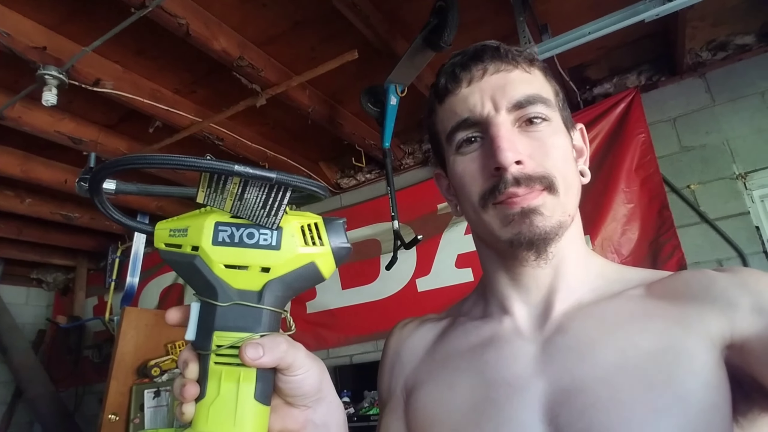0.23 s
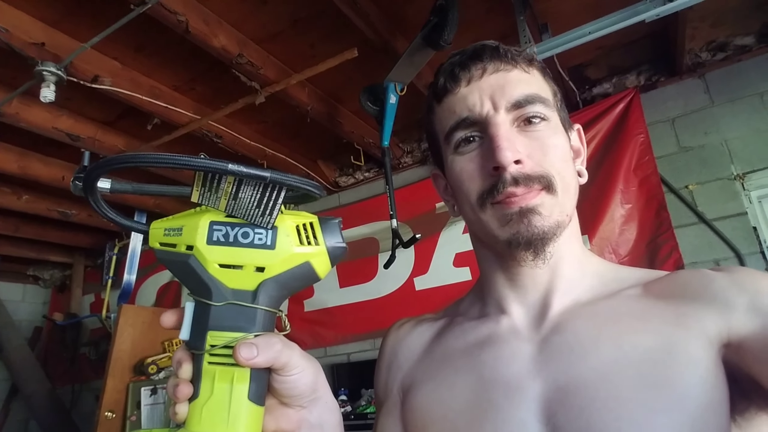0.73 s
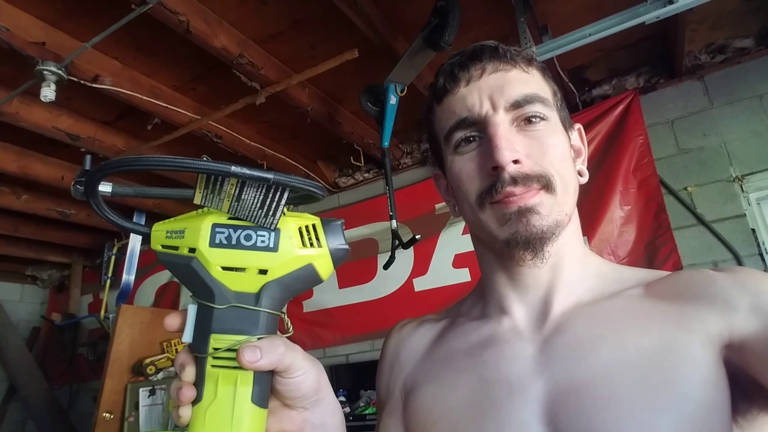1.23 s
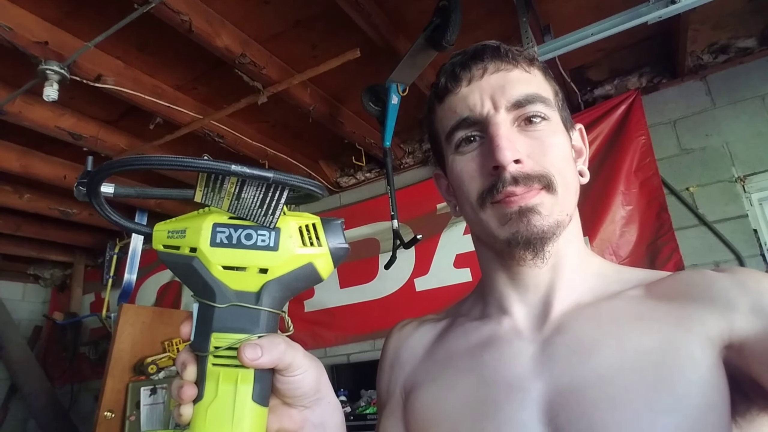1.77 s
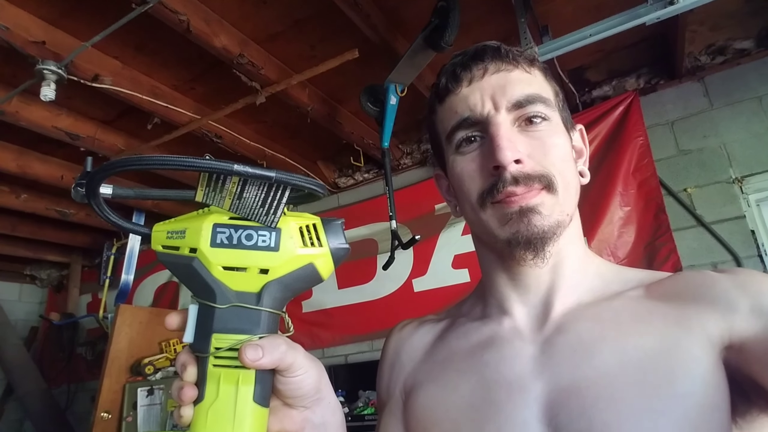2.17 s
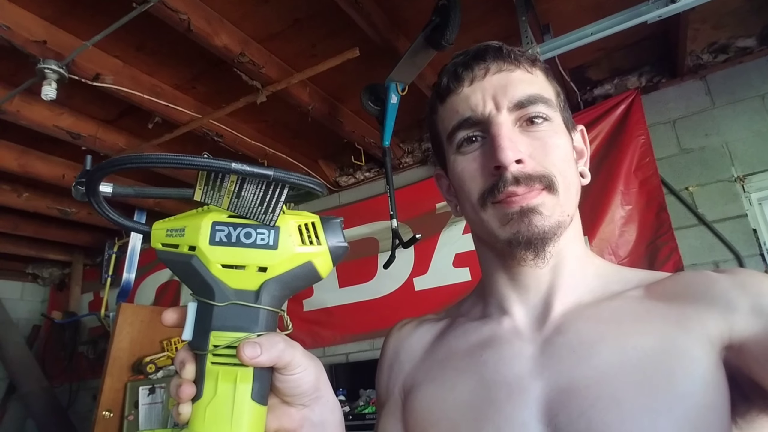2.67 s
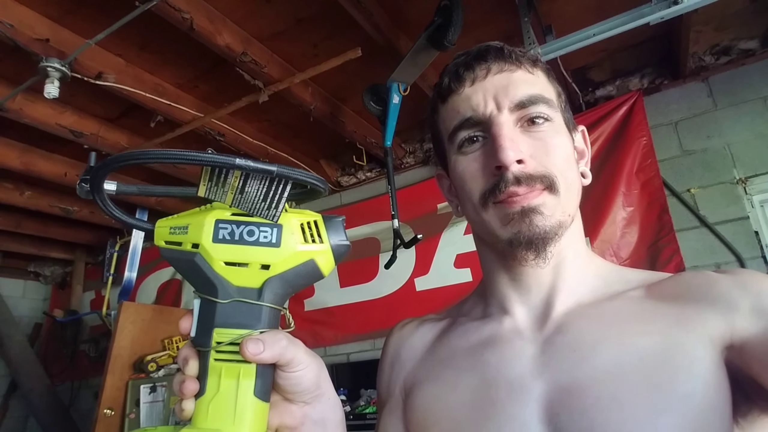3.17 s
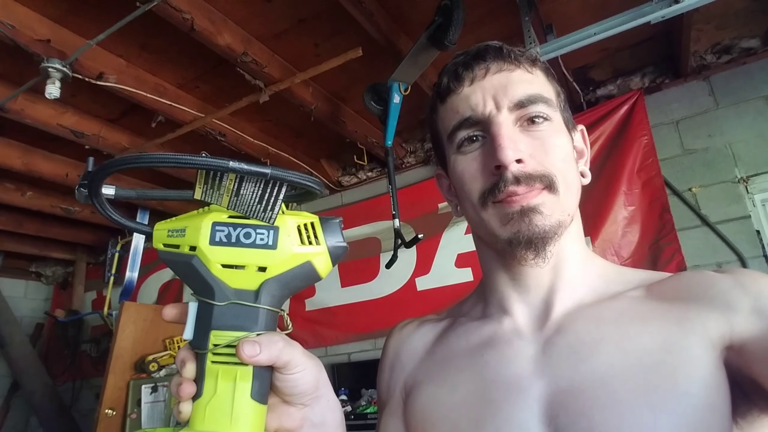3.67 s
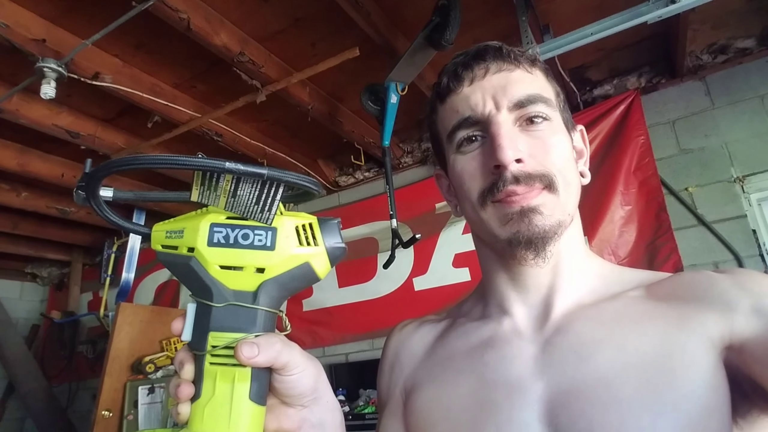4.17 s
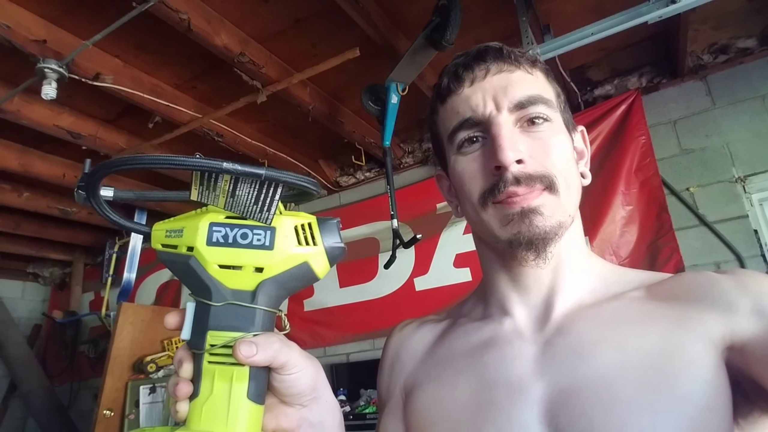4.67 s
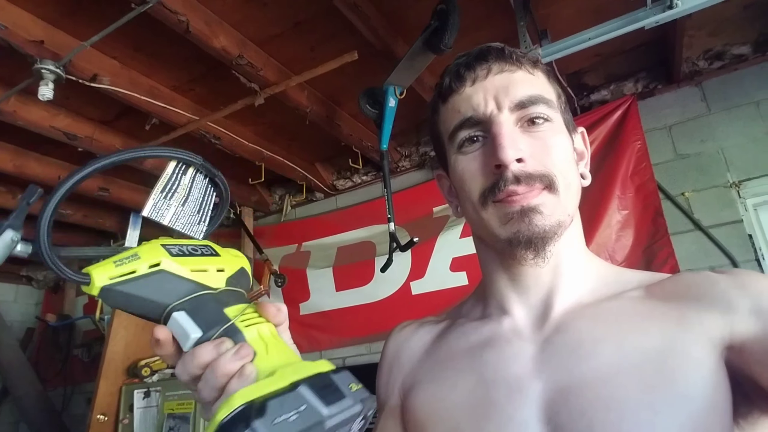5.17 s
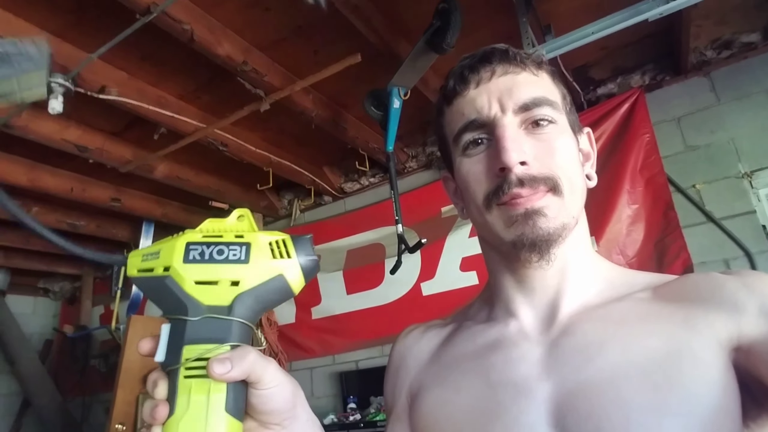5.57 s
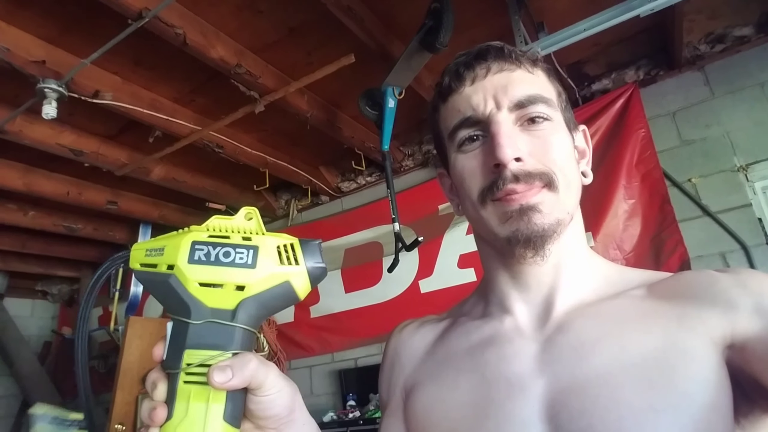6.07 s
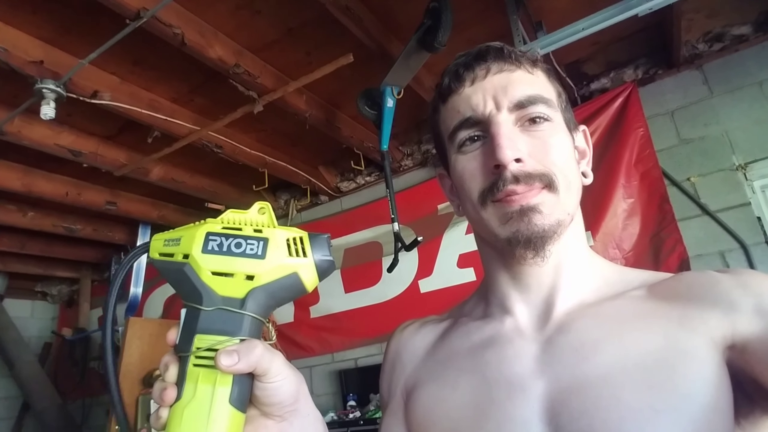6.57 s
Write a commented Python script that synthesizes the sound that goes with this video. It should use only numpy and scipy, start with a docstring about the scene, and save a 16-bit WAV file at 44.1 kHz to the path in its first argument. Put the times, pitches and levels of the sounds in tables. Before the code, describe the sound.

A cordless tyre inflator runs close to the microphone in a slightly reverberant garage with a faint low hum. It is already spinning up at the start and cuts out after about 0.3 seconds. Four more short bursts follow at about 1, 1.8, 3 and 4 seconds, each lasting under half a second. In every burst the pump hammers rapidly and the hose chatters hard against the plastic housing, then the motor coasts down with a dry, falling whirr of gears and a few knocks. Brief, thin squeals come with some bursts. From about 5 seconds there is a soft rumble and rustle as the tool is turned and its hose swings free. At 5.7 seconds the trigger clicks and the motor spins up again, now running smoothly with a steady high whine over rushing air until the end, near 6.8 seconds.

```python
"""A cordless tyre inflator runs in a garage: five short bursts, then a run with its hose swung free.
One motor shaft drives the fan, the gears and the piston pump. In the bursts the stowed hose chatters
on the plastic housing and the pump knocks hard; each coast-down leaves a dry whirr of gears.
With the hose free the motor runs smoothly: the harmonic whine of a seven-blade fan over rushing air.
A low hum fills the room."""
import sys
import numpy as np
from scipy import signal
from scipy.fft import rfft, irfft
from scipy.io import wavfile

SR = 44100
rng = np.random.default_rng(int(sys.argv[2]) if len(sys.argv) > 2 else 0)


def bounce(signal):
    """Save signal as a 16-bit WAV file at the path given by the first command-line argument."""
    frames = np.transpose(np.atleast_2d(signal))
    limited = np.clip(frames, -1, 1)
    pcm = np.round(limited * 32767).astype(np.int16)
    wavfile.write(sys.argv[1], SR, pcm)


N = 300304
TIME = np.arange(N) / SR
BINS = np.fft.rfftfreq(N, 1 / SR)
FULL_SPEED_HZ, BLADES, TURNS_PER_STROKE = 335, 7, 7
HOSE_FREE_S, BAND_EDGE_HZ = 5.3, 15800

# Levels in the tables are relative: each source applies its own gain.
# Envelope of the room hum: time_s, level_db
HUM_ENVELOPE = [(0.0, -51), (2.8, -52.5), (3.13, -46), (3.3, -60.5), (4.9, -51.5), (5.75, -43.5),
                (6.81, -43.5)]
# Faint steady tones in the room: pitch_hz, level_db
ROOM_TONES = [(820, -73.5), (1195, -70.5)]
# Spectrum of the room noise: frequency_hz, level_db
ROOM_SPECTRUM = [(15, -64), (25, -55), (43, -32), (52, -13), (76, -5.5), (137, -15.5), (170, -23),
                 (217, -26.5), (1020, -31), (1230, -34.5), (1400, -37.5), (16000, -57)]
# Reverberation of the garage: frequency_hz, t60_s, reverb_to_direct_db
GARAGE_REVERB = [(150, 0.56, -15), (500, 0.78, -14), (1200, 0.52, -8.5), (3000, 0.25, -12),
                 (6960, 0.18, -11), (15000, 0.033, -13)]
# Later arrival of sound on the left: frequency_hz, delay_samples
LEFT_DELAY = [(500, 9.1), (1000, 7.9), (1500, 8.8), (2000, 10.3), (2500, 10.54), (3200, 9.45),
              (4200, 14.45), (8000, 14.76), (15000, 14)]
# Likeness of left and right, as the whole housing radiates: frequency_hz, coherence_ratio
COHERENCE = [(300, 0.84), (1000, 0.76), (2200, 0.69), (4000, 0.56), (8000, 0.19), (15000, 0.1)]
# The hand turns the tool and swings the hose free: time_s, rumble_db, rustle_db
HANDLING_ENVELOPE = [(4.92, -66, -68), (5.15, -53.5, -60.5), (5.47, -48, -54), (5.49, -54, -49),
                     (5.52, -47, -56), (5.71, -48, -58), (5.9, -50, -46)]
# Trigger clicks just before the motor starts: time_s, level_db
TRIGGER_CLICKS = [(4.013, -49), (5.727, -37)]
# Pulls of the trigger: on_s, off_s, at_rest_s, top_speed_hz
MOTOR_RUNS = [(-.06, .305, .7, 344), (.955, 1.39, 1.81, 338), (1.845, 2.29, 2.88, 333),
              (3.013, 3.42, 3.89, 330), (4.029, 4.28, 4.88, 336), (5.738, 7, 7.5, 335.25)]
# Shape of a coast-down: duration_fraction, speed_fraction
COAST_DOWN = [(0, 1), (.18, .77), (.48, .52), (.72, .33), (1, 0)]
# Resonances of the plastic housing: centre_hz, width_hz, lift_db
HOUSING_MODES = [(964, 200, 3), (1917, 140, 3), (2372, 380, 6), (3211, 110, 8), (5200, 100, 6),
                 (7180, 320, 4.5), (13870, 1200, 3.5)]
# Low modes of the pump body: pitch_hz, level_db, t60_s
BODY_MODES = [(151, -1.5, 0.032), (248, -2, 0.059), (280, -5, .06), (410, 2, 0.03)]
# Brief squeals of the pump: centre_s, length_s, pitch_hz, level_db
PUMP_SQUEALS = [(0.33, .1, 8400, -37.5), (1.972, 0.26, 8400, -32), (3.142, 0.16, 8400, -30),
                (5.8, .11, 3670, -32), (6.28, .05, 8400, -42)]
# Spectrum of the gear whirr: frequency_hz, left_db, right_db
GEAR_SPECTRUM = [(40, -40.5, -41), (150.0, -19, -19), (337, -25.5, -13), (480.0, 1.5, 1.5),
                 (695, -18, -12.5), (1050.0, -8.5, -3.5), (1860, -0.5, -3), (2600.0, -2.5, -11.5),
                 (3300, -3.5, 1.5), (4740, -13, -6.5), (7100, -11.5, -6.5), (8400.0, -27.5, -12.5),
                 (9250, -20.5, -16.5), (11200, -14, -7.5), (15000.0, -9.5, -8)]
# Spectrum of the rushing air: frequency_hz, left_db, right_db
AIR_SPECTRUM = [(40, -49, -43), (151, -28.5, -24.5), (330.0, -18.5, -19.5), (680, -17, -11.5),
                (1060, -6, 2.5), (1750, -7.5, -9.5), (2150, 2, -4.5), (3320, -12, -9.5),
                (4480, -18.5, -13.5), (5600.0, -18, -15.5), (7160, -17, -11), (8240, -35.5, -17),
                (9750, -27, -19.0), (11500.0, -18, -9.5), (15000.0, -14, -10.5)]
# The blade tone stands out as it climbs or falls: centre_s, length_s, level_db
BLADE_SWELLS = [(0.352, 0.16, -38), (1.44, 0.13, -46.5), (1.947, .16, -34.5), (3.12, 0.2, -35),
                (3.697, .12, -52)]
# Partials of the whine: shaft_multiple, left_db, right_db
WHINE_PARTIALS = [(1.0, -53.0, -51.0), (3.0, -61.0, -43.0), (5.0, -40.0, -43.0), (6.0, -33.0, -36.0),
                  (7.0, -29.5, -41.5), (8.0, -36.0, -43.0), (9.0, -36.0, -43.0), (10.0, -58.0, -46.0),
                  (11.0, -67.0, -48.0), (14.0, -51.0, -32.0), (15.0, -50.0, -41.0), (16.0, -57.0, -47.0),
                  (20.0, -46.0, -40.0), (21.0, -49.0, -33.0), (22.0, -55.0, -40.0), (33.0, -51.0, -39.0),
                  (34.0, -41.0, -33.5), (35.0, -44.0, -48.0), (36.0, -53.0, -39.0), (37.0, -59.0, -42.0),
                  (38.0, -55.0, -45.0), (39.0, -53.0, -38.0), (40.0, -45.0, -33.0), (41.0, -45.0, -35.0),
                  (42.0, -43.0, -41.0), (43.0, -54.0, -41.0), (44.0, -46.0, -49.0), (45.0, -47.0, -41.0),
                  (46.0, -36.0, -36.0), (47.0, -46.0, -52.0)]
# The whine swells and eases with the hose free: time_s, level_db
WHINE_ENVELOPE = [(5.8, -2), (6.0, .5), (6.2, .5), (6.5, 0), (6.81, -1)]
# Single knocks as the tool jerks into motion or slows: time_s, level_db
SINGLE_KNOCKS = [(0.003, -14), (0.267, -16), (0.388, -12), (0.465, -18), (0.556, -22), (0.958, -27),
                 (0.993, -8), (1.325, -13.5), (1.364, -11), (1.398, -15), (1.469, -23.5), (1.864, -11),
                 (1.892, -15.5), (2.015, -13), (2.278, -14), (2.322, -12.5), (2.358, -14.5), (3.136, -12.5),
                 (3.411, -11.5), (3.448, -11.5), (3.485, -16.5), (4.061, -11), (4.079, -9.5),
                 (4.284, -12.5), (4.309, -17.5), (4.324, -12.5), (4.36, -17), (5.743, -24.5)]
# Even hammering of the pump at speed: start_s, length_s, rate_hz, knock_db, push_db
KNOCK_TRAINS = [(.133, .12, 37.3, -11.5, -37.5), (1.025, .28, 47.8, -12.5, -34.5),
                (2.048, .205, 50.9, -12, -34), (3.181, .207, 50.5, -11.5, -34),
                (4.106, .157, 47.1, -12, -38)]
# The stowed hose chatters under power: start_s, rise_s, hold_s, level_db, sag_db_per_s
HOSE_SHAKES = [(0.109, 0.0035, 0.26, -17.5, 48.5), (.955, 0.008, 0.41, -19.5, 12),
               (1.84, 0.17, .43, -16.5, 9), (3.015, 0.084, 0.42, -15.5, 24), (4.028, .045, 0.29, -18, 36.5)]
# The hose sways and clatters as the speed changes: peak_s, rise_s, fall_s, level_db
HOSE_CLATTERS = [(0.0, .01, .012, -18.5), (.075, 0.046, .03, -27.5), (.38, 0.016, .01, -22),
                 (0.457, 0.013, 0.0071, -20), (.615, 0.067, 0.015, -33), (1.02, 0.022, 0.013, -15.5),
                 (1.27, 0.023, .03, -22), (1.45, 0.037, 0.17, -33), (1.645, 0.027, 0.0088, -22.5),
                 (3.179, 0.034, 0.056, -16), (3.772, 0.046, 0.016, -30.5), (4.112, 0.023, 0.0146, -15)]
# Spectrum of the plastic rattle: frequency_hz, left_db, right_db
RATTLE_SPECTRUM = [(40, -49.5, -43.5), (120.0, -22.5, -15.5), (247, -15, -16), (590, -14.5, -8.5),
                   (990, -10.5, -4), (1570, -3.5, -3), (2560, -1, -5.5), (3500, -2.5, 1),
                   (4700, -11.5, -3.5), (5400, -11, -6), (6800, -8.5, -1.5), (8400, -31, -7.5),
                   (9240, -16.5, -12), (11050, -16.5, -4), (14300, -7, -2)]


def gain_of(db):
    """Amplitude ratio of a level in decibels."""
    return 10 ** (np.asarray(db) / 20)


def unit_rms(x):
    """Normalisation to an rms of one."""
    return x / np.sqrt(np.mean(abs(x) ** 2) + 1e-20)


def envelope(rows, column=1):
    """Linear interpolation of one column of a time table at every sample."""
    rows = np.array(rows, float)
    return np.interp(TIME, rows[:, 0], rows[:, column])


def spectrum(rows, hz=BINS):
    """Interpolation of a table's columns on a logarithmic frequency axis."""
    table_hz, *columns = np.transpose(rows)
    return np.array([np.interp(np.log(hz + 1), np.log(table_hz + 1), c) for c in columns])


def gate(start, end, fade):
    """Trapezoidal window from start to end."""
    return np.clip((TIME - start) / fade, 0, 1) * np.clip((end - TIME) / fade, 0, 1)


def swell(peak_s, rise_s, fall_s):
    """Exponential growth to one, then exponential decay."""
    return np.exp(-np.minimum(np.maximum((peak_s - TIME) / rise_s, (TIME - peak_s) / fall_s), 20))


def wander(per_s):
    """Random modulation of rms about one, linear between knots."""
    knots = np.arange(0, TIME[-1] + 1, 1 / per_s)
    return 1.2 * np.interp(TIME, knots, rng.standard_normal(SR // 4)[:len(knots)])


def coloured(x, db):
    """Minimum-phase filtering along a dB curve, keeping the power of white noise."""
    log_gain = np.log(unit_rms(gain_of(db)) + 1e-5)
    mirrored = np.concatenate([log_gain, log_gain[..., -2:0:-1]], -1)
    response = np.exp(np.conj(signal.hilbert(mirrored)))[..., :len(BINS)]
    return irfft(rfft(x) * response, N)


def impacts(per_s, spread_db):
    """Shot noise: a Poisson train of clicks of uneven size."""
    size = gain_of(spread_db * np.minimum(rng.exponential(1, N), 3.5)) * rng.choice([-1, 1], N)
    return unit_rms(size * (rng.random(N) < per_s / SR))


def grit(per_s, spread_db, hiss):
    """Partial coherence: clicks and hiss from an extended source differ between left and right."""
    common, separate = (rfft(unit_rms(impacts(per_s, spread_db) + hiss * rng.standard_normal(N)))
                        for _ in range(2))
    coherence = np.clip(spectrum(COHERENCE)[0], 0, 1)
    right = coherence * common + np.sqrt(1 - coherence ** 2) * separate
    return irfft(np.array([common, right]), N)


def housing_db():
    """Resonance: each mode of the housing lifts a band of the spectrum."""
    return sum(db / (1 + (2 * (BINS - hz) / width) ** 2) for hz, width, db in HOUSING_MODES)


def room(hum_hz=73.2, noise_above_120_hz_db=-61.5):
    """Superposition of a wavering hum, two faint tones and steady noise."""
    hum_phase = 2 * np.pi * hum_hz * TIME + 0.3 * wander(6.8)
    hum = np.sqrt(2) * gain_of(envelope(HUM_ENVELOPE) + 1.7 * wander(17)) * np.sin(hum_phase)
    tones = sum(gain_of(db + 1.8 * wander(4.7)) * np.sin(2 * np.pi * hz * TIME + wander(21))
                for hz, db in ROOM_TONES)
    noise = coloured(rng.standard_normal(N) + .5 * rng.standard_normal((2, N)), spectrum(ROOM_SPECTRUM))
    upper_rms = irfft(rfft(noise) * (BINS > 120), N).std()
    return hum * gain_of([[.9], [-.9]]) + tones + noise / upper_rms * gain_of(noise_above_120_hz_db)


def in_garage(x, early_db=-6, early_decay_s=0.0089):
    """Convolution with the direct path, early reflections off hand and chest, and a diffuse tail."""
    t = np.arange(SR // 2) / SR
    echoes = rng.standard_normal((2, len(t))) * (rng.random((2, len(t))) < .1) * (t > .005)
    hz, frame_s, bands = signal.stft(echoes, SR, nperseg=256)
    t60 = spectrum(GARAGE_REVERB, hz)[0][:, None]
    tail = signal.istft(bands * gain_of(-60 * frame_s / t60) / np.sqrt(t60), SR, nperseg=256)[1]
    early = rng.standard_normal((2, len(t))) * np.exp(-t / early_decay_s) * (t > .0007)
    scattered = unit_rms(rfft(tail, N)) + gain_of(early_db) * unit_rms(rfft(early, N))
    wet = gain_of(spectrum(GARAGE_REVERB)[1])
    direct = np.exp(-2j * np.pi * BINS / SR * spectrum(LEFT_DELAY) * [[1], [0]])
    response = irfft((direct + wet * scattered) / np.sqrt(1 + wet ** 2), N)
    lead = 64  # samples of the response ahead of the direct arrival
    return signal.fftconvolve(x, np.roll(response, lead, 1)[:, :len(t)], axes=1)[:, lead:lead + N]


def handling(low_hz=55, high_hz=100):
    """Friction noise of the hose sliding off, over the low rumble of moving arms."""
    band_db = -10 * np.log10(1 + (BINS / high_hz) ** 5) - 10 * np.log10(1 + (low_hz / (BINS + 1)) ** 4)
    rumble = coloured(rng.standard_normal(N), band_db)
    rumble *= gain_of(envelope(HANDLING_ENVELOPE) - 2 + 2.5 * wander(42))
    scrape = np.array([impacts(per_s=2500, spread_db=3.5) for _ in range(2)])
    scrape *= gain_of(envelope(HANDLING_ENVELOPE, column=2) + 1)
    rustle = coloured(scrape, spectrum([(300, 4), (1200, 1), (3300, -8), (8000, -13), (14000, -9.5)])[0])
    return (rumble + rustle) * gate(4.92, np.inf, fade=0.06)


def trigger():
    """Impulsive excitation: the trigger clicks through the resonances of the housing."""
    size = sum(gain_of(db) * swell(s, rise_s=.0008, fall_s=.0025) for s, db in TRIGGER_CLICKS)
    return coloured(size * rng.standard_normal(N), spectrum(GEAR_SPECTRUM) + housing_db())


def shaft_speed(spin_up_s=.043):
    """Rotational inertia: the shaft speed, in Hz, rises exponentially at each pull, then coasts down."""
    speed = np.zeros(N)
    for on, off, rest, top_hz in MOTOR_RUNS:
        rise = 1 - np.exp(-np.maximum(TIME - on, 0) / spin_up_s)
        coast = np.interp((TIME - off) / (rest - off), *np.transpose(COAST_DOWN))
        speed += top_hz * rise * coast
    return speed


def squeals(width_hz=750):
    """Friction rubs a narrow resonance of the pump into short, rough ringing."""
    out = np.zeros(N)
    for s, length, hz, db in PUMP_SQUEALS:
        phase = 2 * np.pi * hz * TIME
        ring = wander(width_hz) * np.cos(phase) + wander(width_hz) * np.sin(phase)
        out += gain_of(db) * gate(s - length / 2, s + length / 2, length / 3) * ring
    return out * gain_of([[-4], [1]])


def gears(speed, turns, resonance_hz=480, half_width_hz=42):
    """Contact noise of teeth and brushes; the second shaft harmonic groans through a body resonance."""
    pace = speed / FULL_SPEED_HZ * (TIME < HOSE_FREE_S)
    angle = 2 * np.pi * turns
    piston_reversals = np.cos(2 * angle / TURNS_PER_STROKE)
    pulsing = unit_rms(np.exp(0.19 * np.cos(angle) + 0.19 * piston_reversals))
    whirr = grit(per_s=5000, spread_db=5, hiss=1.0) * pulsing * gain_of(-35) * pace ** 0.88
    resonance = 1 / np.hypot(1, (2 * speed - resonance_hz) / half_width_hz)
    groan = gain_of(-48 + 2 * wander(30)) * pace * resonance * np.sin(2 * angle + .55 * wander(80))
    return coloured(whirr, spectrum(GEAR_SPECTRUM) + housing_db()) + groan


def air(speed, turns, level_db=-23, sag_db_per_s=0.67):
    """Flow noise of the open pump in the last run grows with speed, pulsed by piston and shaft."""
    angle = 2 * np.pi * turns
    pulsing = 1 + 0.056 * np.cos(angle / TURNS_PER_STROKE) + 0.39 * np.cos(angle)
    elapsed = np.maximum(TIME - MOTOR_RUNS[-1][0], 0)
    flow = (speed / FULL_SPEED_HZ) ** 0.73 * (elapsed > 0)
    size = gain_of(level_db - sag_db_per_s * elapsed + 0.82 * wander(40)) * flow
    return coloured(size * pulsing * grit(per_s=8300, spread_db=3.0, hiss=2.1), spectrum(AIR_SPECTRUM))


def blade_tone(speed, turns, jitter_rad=2.3):
    """Blade-passing tone of the fan with the hose stowed, roughened by random modulation."""
    size = gain_of(-46) * (speed / FULL_SPEED_HZ) ** 5 * (TIME < HOSE_FREE_S)
    for s, length, db in BLADE_SWELLS:
        size += gain_of(db) * gate(s - length / 2, s + length / 2, length / 3)
    return size * gain_of(2 * wander(90)) * np.sin(2 * np.pi * BLADES * turns + jitter_rad * wander(150))


def whine(speed, turns, stowed_db=-14, waver_db=2.5, blade_lag_rad=0.6):
    """Harmonic series of the shaft rotation; a steep power law lets it sing only near full speed."""
    level_db = np.where(TIME > HOSE_FREE_S, envelope(WHINE_ENVELOPE) - 1.5, stowed_db)
    size = gain_of(level_db) * (speed / FULL_SPEED_HZ) ** 7
    out = np.zeros((2, N))
    for order, left_db, right_db in WHINE_PARTIALS:
        amplitude = size * gain_of(waver_db * wander(25))
        phase = 2 * np.pi * (order * turns + rng.random()) + 0.25 * wander(70)
        hz = order * FULL_SPEED_HZ
        lag = blade_lag_rad if order == BLADES else 2 * np.pi * hz / SR * spectrum(LEFT_DELAY, hz)[0]
        out[0] += gain_of(left_db) * amplitude * np.sin(phase - lag)
        out[1] += gain_of(right_db) * amplitude * np.sin(phase)
    return np.sqrt(2) * out


def pump_knocks(single_push_db=-27.5):
    """Isolated impacts and periodic impact trains, as rows of time_s, knock_db, push_db."""
    knocks = [(s, db, db + single_push_db) for s, db in SINGLE_KNOCKS]
    for start, length, rate_hz, db, push_db in KNOCK_TRAINS:
        times = start + np.arange(0, length, 1 / rate_hz)
        levels_db = db - 0.7 * rng.uniform(-1.8, 1, size=40)
        knocks += [(s, knock_db, push_db) for s, knock_db in zip(times, levels_db)]
    return knocks


def thumps(knocks):
    """Damped modes of the pump body ring at each push; in a train they merge into a pitched chug."""
    pushes = np.zeros(N)
    for s, _, push_db in knocks:
        pushes[round(s * SR)] = gain_of(push_db)
    t = np.arange(SR // 8) / SR
    ring = sum(gain_of(db - 60 * t / t60) * np.cos(2 * np.pi * hz * t) for hz, db, t60 in BODY_MODES)
    return signal.oaconvolve(pushes, ring)[:N] * gain_of([[-1], [1]])


def chatter_power(jolt_fraction=0.064, release_db_per_s=126):
    """Incoherent addition: the shakes and clatters of the stowed hose sum in power."""
    power = sum((gain_of(db) * swell(s, rise, fall)) ** 2 for s, rise, fall, db in HOSE_CLATTERS)
    for start, rise, hold, db, sag in HOSE_SHAKES:
        t = np.maximum(TIME - start, 0)
        attack = (t > 0) * (1 - (1 - jolt_fraction) * np.exp(-t / rise))
        level_db = db - sag * t - release_db_per_s * np.maximum(t - hold, 0)
        power += (attack * gain_of(level_db)) ** 2
    return power * gain_of(1.64 * wander(40)) ** 2


def rattle(speed, turns, knocks, rise_s=0.0017, fall_s=0.0018, knock_tilt_db=2):
    """Forced vibration: tiny plastic impacts bunch once a turn, louder and brighter at each knock."""
    knock_power = np.zeros(N)
    for s, db, _ in knocks:
        near = slice(max(0, int((s - .03) * SR)), int((s + .03) * SR))
        t = TIME[near] - s
        knock_power[near] += gain_of(db + 0.47) ** 2 * np.exp(np.where(t < 0, t / rise_s, -t / fall_s))
    bunching = unit_rms(np.exp(0.3 * np.cos(2 * np.pi * turns))) * (speed > 0)
    plastic_db = spectrum(RATTLE_SPECTRUM) + housing_db()
    chatter = (chatter_power() * gain_of(0.5) ** 2, plastic_db)
    clacks = (knock_power, plastic_db + knock_tilt_db * BINS / BAND_EDGE_HZ)
    return sum(coloured(np.sqrt(power) * bunching * grit(per_s=8000, spread_db=3.0, hiss=0.65), db)
               for power, db in (chatter, clacks))


def scene():
    """Superposition: the tool's noises reverberate; its fan tones and the room sound add directly."""
    speed, knocks = shaft_speed(), pump_knocks()
    speed_jitter = np.where(TIME > HOSE_FREE_S, .0004, .006)
    turns = np.cumsum(speed * (1 + speed_jitter * wander(30))) / SR
    pump = rattle(speed, turns, knocks) + thumps(knocks) + air(speed, turns) + squeals()
    tool = pump + gears(speed, turns) + trigger() + handling()
    return in_garage(tool) + blade_tone(speed, turns) + whine(speed, turns) + room()


def record(dry):
    """Soft saturation rounds the loudest peaks; a low-pass filter then limits the band."""
    low_pass = signal.firwin(1023, BAND_EDGE_HZ, window=("kaiser", 9), fs=SR)
    return signal.oaconvolve(np.tanh(dry), low_pass[None], "same")


dry = scene()
out = record(dry)
bounce(out)
```